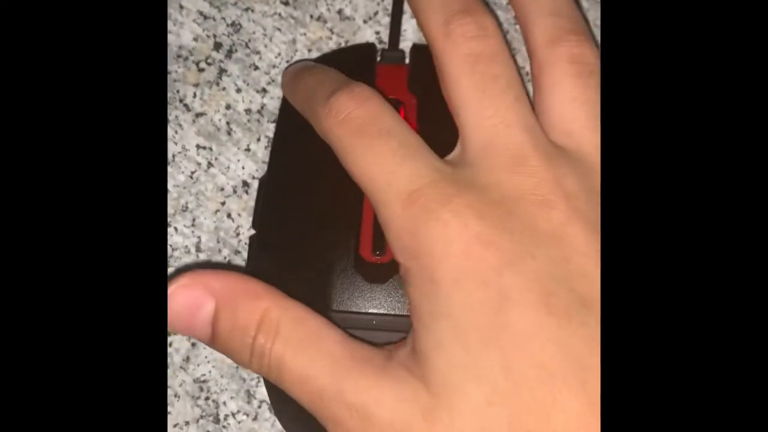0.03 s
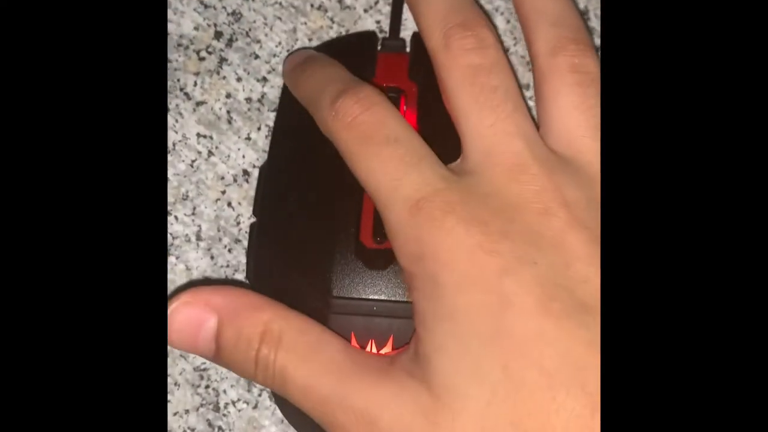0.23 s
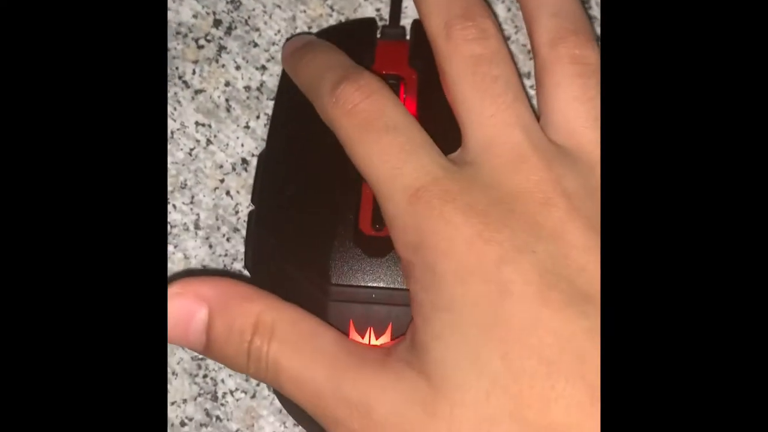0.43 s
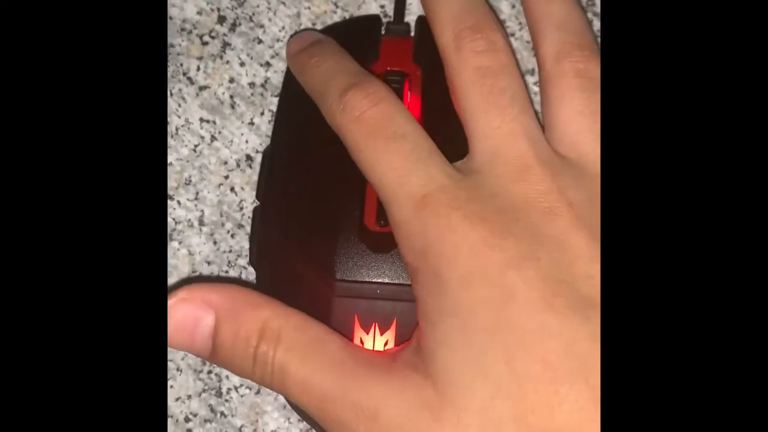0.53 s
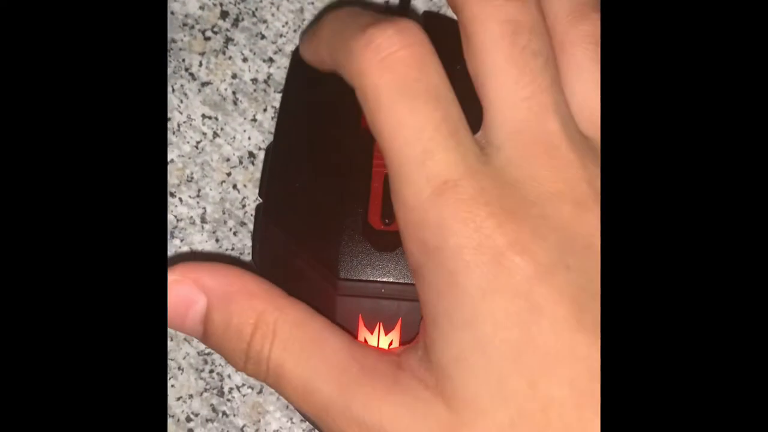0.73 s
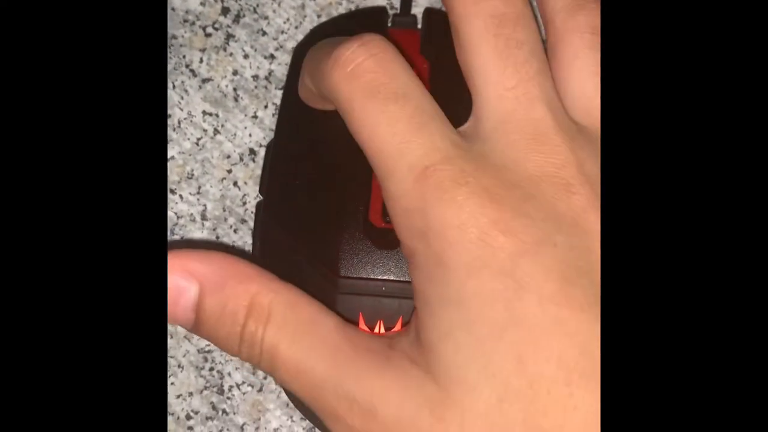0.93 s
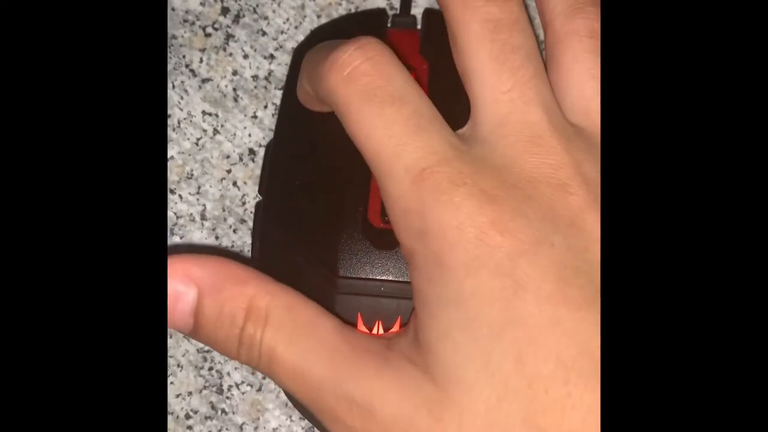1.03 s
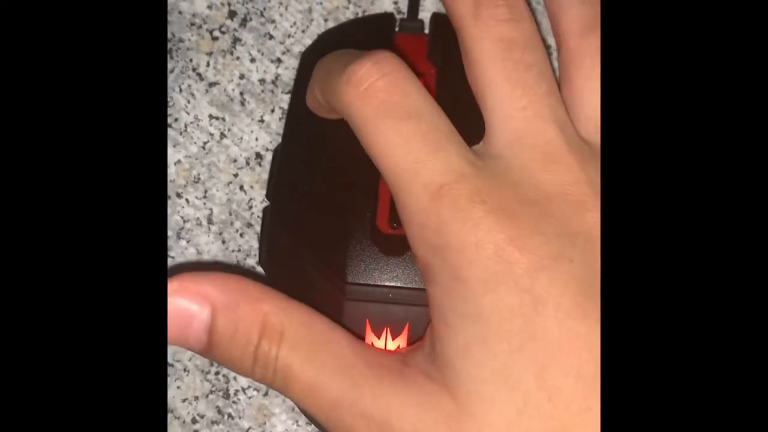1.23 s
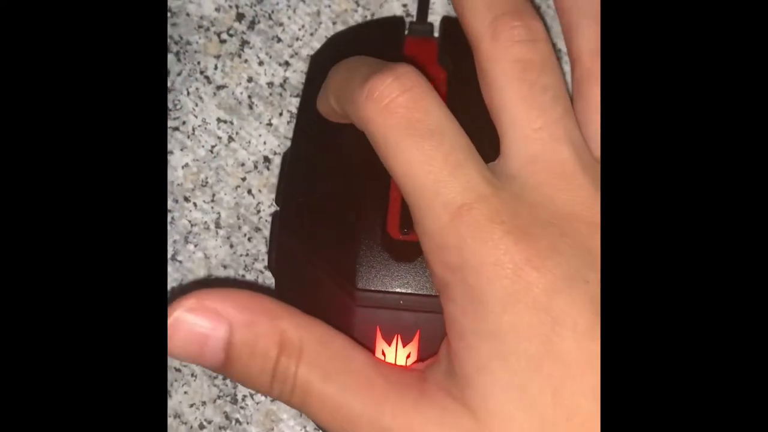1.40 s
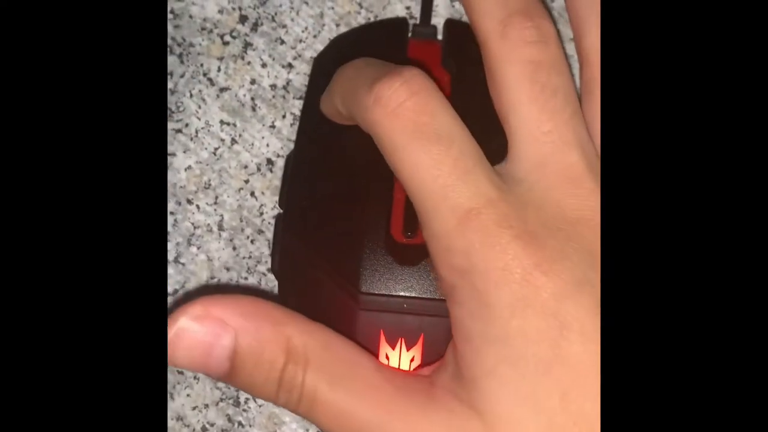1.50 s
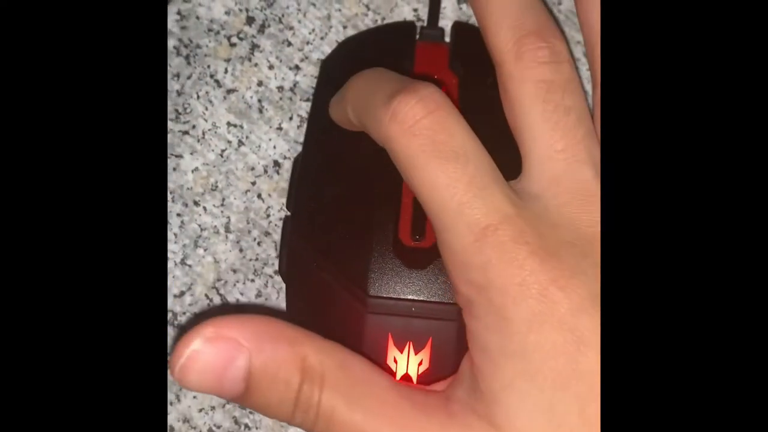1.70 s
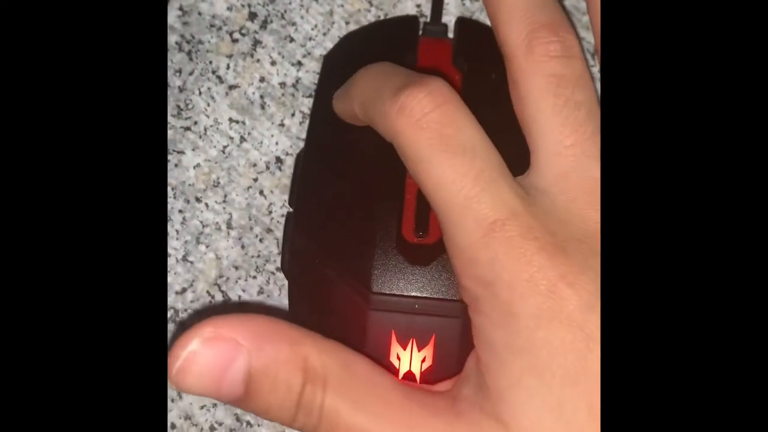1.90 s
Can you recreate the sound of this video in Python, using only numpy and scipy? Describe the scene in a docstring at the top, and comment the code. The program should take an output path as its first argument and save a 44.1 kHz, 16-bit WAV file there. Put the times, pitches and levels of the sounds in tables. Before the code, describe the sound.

A finger clicks a plastic computer mouse on a stone desk, close to the microphone: a release, one full click, faint taps and rubs, then four rapid clicks, over soft mains hum and low rumble.

```python
"""A finger clicks the button of a plastic computer mouse on a stone desk, close to the microphone.
Each press and release flips a spring switch: its contacts crackle as noise and ring damped shell modes.
A press then knocks the button on its stop, and a release knocks lightly, ringing the hollow body.
Between clicks the finger ticks, rubs and thuds on the shell, as filtered noise and damped modes.
A small room answers with decaying noise; wavering mains hum, low rumble and faint hiss lie beneath."""
import sys
import numpy as np
from scipy import signal
from scipy.fft import rfft, irfft
from scipy.io import wavfile
from scipy.ndimage import uniform_filter1d

SR = 44100
rng = np.random.default_rng(int(sys.argv[2]) if len(sys.argv) > 2 else 0)


def persist_wave(psi):
    """Save psi, clipped to +-1, as 16-bit WAV."""
    counts = np.round(np.clip(psi, -1, 1) * 32767).astype(np.int16)
    wavfile.write(sys.argv[1], SR, np.atleast_2d(counts).T)


N = 85995
T = np.arange(SR // 3) / SR  # time axis of one short sound (s)
SNAP_ATTACK_S = 0.00015  # rise of a switch contact or a nail tick

# Modes of the plastic shell. Each row: nominal frequency in Hz, t60 in seconds,
# level on a press in dB, level on a release in dB.
SHELL_MODES = [(3564, 0.012, -21.5, -23), (4486, .012, -21, -15), (6009, 0.0057, -5, -1),
               (6448, 0.015, -21, -2), (7108, 0.022, -3.5, -10.5), (7358, 0.014, -6.5, 3.5),
               (8025, 0.011, -1.5, -2.5), (8440, 0.0065, -6.5, -6), (9030, 0.0053, -15, -14.5),
               (10993, 0.005, -29, -13.5), (11590, 0.005, -22, -8.5), (12230, 0.0054, -11, -1.5),
               (13530, 0.0088, -7.5, .5), (13300, .008, -21, -5.5), (14650, 0.008, -15, -7),
               (16300, 0.01, -18.5, -19.5)]


def undb(db):
    """Level to amplitude: 20 dB is a factor of ten."""
    return 10 ** (np.asarray(db) / 20)


def noise(points, size):
    """Spectral shaping: white noise filtered to the given spectrum, at rms 1."""
    hz, db = np.array(points, float).T
    f = np.maximum(np.fft.rfftfreq(size, 1 / SR), 1)
    gain = undb(np.interp(np.log(f), np.log(hz), db))
    x = irfft(rfft(rng.standard_normal(size)) * gain, size)
    return x / x.std()


def envelope(attack, hold, t60):
    """Exponential damping after a straight rise and a hold: a fall of 60 dB in t60 seconds."""
    fall_time = np.maximum(T - attack - hold, 0)
    return np.minimum(T / attack, 1) * np.exp(-np.log(1000) * fall_time / t60)


def add(track, s, x):
    """Superposition: add a sound to the track, starting at s seconds."""
    i = int(s * SR)
    track[i:i + len(x)] += x[:len(track) - i]


def ring(hz):
    """Modal vibration: one undamped sine, slightly detuned, at a chance phase."""
    detuned_hz = hz * (1 + 0.0073 * rng.standard_normal())
    return np.sin(2 * np.pi * (detuned_hz * T + rng.random()))


def button():
    """Impact sequence: snaps, their spread in all directions, and the knocks that ring the body."""
    # Each row: start in seconds, snap level in dB, colour at 6, 8.4, 9.1 and 13 kHz in dB,
    # knock level in dB, travel to the stop in seconds, body pitch ratio, upper body modes in dB.
    presses = [(0.1536, -28, -5, -3, -2.5, -10.5, -38, 0.0029, 1.004, -3),
               (0.878, -34, -2.5, 0.5, -3.5, 1, -39, 0.0032, 1, 2),
               (1.0793, -31.5, -1, -2.5, 4, 0.5, -35.5, 0.0029, 1.01, 0.5),
               (1.2533, -30, 0.5, -7, 9.5, -5.5, -33, .0025, .99, 0),
               (1.412, -33.5, 1.5, 1.5, -18.5, 6, -40, 0.00274, 0.988, 0),
               (1.5595, -29.5, 2.5, -1.5, -0.5, 1.5, -32, .0025, 0.989, -1)]
    # Each row: start in seconds, snap level in dB, the same four colours in dB,
    # knock level in dB, body pitch ratio, upper body modes in dB.
    releases = [(0.0643, -30, -7, 4.5, 8.5, -4.5, -45, 1, -3),
                (0.258, -31.5, -16, 7.5, 3.5, -5, -48.5, 0.85, -5),
                (0.9787, -35, 2.5, -45, 12, 1.5, -54, .97, 6),
                (1.1614, -37, 5, 7, 18.4, 6, -49.5, .93, -0.5),
                (1.348, -36, -3, 5.5, 11, 2, -49.5, 0.97, 7.5),
                (1.5044, -38, 6.5, -11.5, 21, -2, -50, 1, -1.5),
                (1.6659, -37, 5, -7.5, 20, 0.5, -48, 0.92, 3)]
    # Spectrum of the snap as it spreads. Each row: frequency in Hz, relative density in dB per Hz.
    spread_spectrum = [(450, -14), (900, -5.5), (2400, -19.5), (3500, -9), (5100, -33.5), (6000, -3),
                       (7400, 0), (8600, -4), (9800, -33), (11200, -2.5), (13300, -7), (14800, -38.5)]
    spread_db = -2
    press_hold_s, release_hold_s = 0.00031, 0.00052
    rebound_s, rebound_db = 0.0072, -14.5
    # the whole mouse rocks on the desk under a press
    rock_hz, rock_t60_s, rock_db, rock_delay_s = 243.6, 0.053, -18.5, 0.007

    snaps, knocks = np.zeros((2, N))
    press_db, release_db = np.array(SHELL_MODES).T[2:]
    for s, db, *colour, knock_db, travel, pitch, upper_db in presses:
        add(snaps, s, undb(db) * snap(press_db, colour, press_hold_s))
        blow = knock(attack=0.002105, hold=0.002, t60_scale=0.98, pitch=pitch, upper_db=upper_db)
        stop = undb(knock_db) * blow
        add(knocks, s + travel, stop)
        add(knocks, s + travel + rebound_s, undb(rebound_db) * stop)
        add(knocks, s + rock_delay_s, undb(knock_db + rock_db) * thud(rock_hz, rock_t60_s))
    for s, db, *colour, knock_db, pitch, upper_db in releases:
        add(snaps, s, undb(db) * snap(release_db, colour, release_hold_s))
        blow = knock(attack=0.0012, hold=0.00069, t60_scale=0.95, pitch=pitch, upper_db=upper_db)
        add(knocks, s, undb(knock_db) * blow)
    loudness = np.sqrt(np.abs(uniform_filter1d(snaps ** 2, size=64)))  # short-time rms
    spread = undb(spread_db) * loudness * noise(spread_spectrum, N)
    return snaps, spread, knocks


def snap(levels, colour, hold):
    """Impulsive excitation: each contact of the switch spring cracks and kicks the shell's modes."""
    # Pitches in Hz at which the finger's place colours the snap; the second is the reference.
    colour_hz = [6000, 7300, 8400, 9100, 13000]
    # Spectrum of the crack. Each row: frequency in Hz, relative density in dB per Hz.
    crack_spectrum = [(350, -19.5), (750, 1.5), (1500, -8.5), (2600, -14), (3500, -4), (4000, -9.5),
                      (4450, 5.5), (4900, -4), (8800, 6.5), (10000, 6), (12000, 2), (15000, 3.5),
                      (16000, -26.5)]
    crack_db, crack_t60_s = -4.5, 0.025
    contact_t60_s = 0.004
    ring_share = 0.55  # gain of the ring-on beside the first contact

    hz, t60 = np.array(SHELL_MODES).T[:2]
    tint = np.interp(hz, colour_hz, [colour[0], 0, *colour[1:]])
    contacts = np.zeros(len(T))
    for s, gain in chatter():
        add(contacts, s, gain * envelope(SNAP_ATTACK_S, hold, contact_t60_s))

    def shape(decay):
        """Forced and free vibration: the larger of the contacts and the ring-on."""
        return np.maximum(contacts, ring_share * envelope(SNAP_ATTACK_S, 0.0026, decay))

    modes = sum(undb(db) * ring(f) * shape(decay) for f, decay, db in zip(hz, t60, levels + tint))
    crack = noise(crack_spectrum, len(T)) * shape(crack_t60_s)
    return modes + undb(crack_db) * crack


def chatter():
    """Contact bounce: the spring strikes twice, then tends to weaken; rows of (seconds, gain)."""
    gap_s, gap_scatter = 0.0011, 0.25  # typical gap, and its spread as a natural logarithm
    fall_db, scatter_db = -6, 1.5  # change per bounce, and its spread
    gaps, sizes = rng.standard_normal(size=(2, 5))
    times = np.cumsum(gap_s * np.exp(gap_scatter * gaps))
    gains = undb(fall_db * np.arange(len(times)) + scatter_db * sizes)
    return [(0, 1), *zip(times, gains)]


def knock(attack, hold, t60_scale, pitch, upper_db):
    """Modal excitation: a blow rings the hollow body; the finger's place and pressure shift its modes."""
    # Each row: frequency in Hz before the pitch ratio, level in dB before the upper-mode gain,
    # t60 in seconds before its scale.
    body_modes = [(244.2, -19.5, 0.29), (670, -17, 0.014), (940, -2.5, 0.018), (1057, -10.5, 0.038),
                  (1464, -19.5, 0.03), (1544, -15, 0.027), (1860, -19, 0.018), (2088, -19, 0.0061)]
    # Corner frequencies in Hz of the band of upper modes.
    upper_hz = [1100, 1400, 1650, 2100]
    out = np.zeros(len(T))
    for f, db, t60 in body_modes:
        gain = undb(db + np.interp(f, upper_hz, [0, upper_db, upper_db, 0]))
        mode = np.sin(2 * np.pi * f * pitch * (T - attack))
        out += gain * mode * envelope(attack, hold, t60 * t60_scale)
    return out


def thud(hz, t60):
    """Rigid-body resonance: the mouse rocks on the desk as one soft, low, damped mode."""
    return ring(hz) * envelope(0.013, 0.0025, t60)


def finger():
    """Impact and friction: the nail ticks, the body knocks and thuds, and the fingertip rubs."""
    # Each row: start in seconds, tick level in dB, rub level in dB, rub length (hold) in seconds,
    # knock level in dB, thud level in dB, upper body modes in dB.
    touches = [(0.455, -70, -64, .012, -62, -60, -13), (0.4779, -43, -44, 0.013, -46, -64, 17),
               (0.492, -60.5, -56, 0.0033, -41.5, -64, -7), (0.699, -59, -63, 0.0079, -70, -82, -4),
               (0.7056, -47.5, -59.5, 0.012, -53, -46, 10), (1.1975, -66, -61, 0.0033, -55, -63, 1),
               (1.8507, -57, -79, 0.00086, -63.5, -68.5, 12.5)]
    # Spectrum of a nail tick. Each row: frequency in Hz, relative density in dB per Hz.
    tick_spectrum = [(400, -5.5), (2000, 2), (2700, -18.5), (3700, 2), (8500, 1), (10000, -9.5),
                     (12000, -6), (14000, -19), (15100, -13), (16500, -54)]
    # Spectrum of a fingertip rubbing the hollow body. Each row: frequency in Hz,
    # relative density in dB per Hz.
    rub_spectrum = [(200, -23), (450, -21), (630, -3.5), (720, 0), (825, 8.5), (890, 1), (970, -1),
                    (1060, -3.5), (1200, -14), (1550, -2.5), (1700, -21), (1870, 0), (2250, -21.5),
                    (5000, -29), (16000, -66)]
    tick_t60_s, rub_t60_s = 0.025, 0.048
    thud_hz, thud_t60_s = 80.7, 0.054

    out = np.zeros(N)
    for s, tick_db, rub_db, length, knock_db, thud_db, upper_db in touches:
        add(out, s, undb(thud_db) * thud(thud_hz, thud_t60_s))
        tick = noise(tick_spectrum, len(T)) * envelope(SNAP_ATTACK_S, 0.0014, tick_t60_s)
        add(out, s, undb(tick_db) * tick)
        rub = noise(rub_spectrum, len(T)) * grip() * envelope(0.00053, length, rub_t60_s)
        add(out, s, undb(rub_db) * rub)
        blow = knock(attack=0.001134, hold=0.0016, t60_scale=0.93, pitch=1.04, upper_db=upper_db)
        add(out, s, undb(knock_db) * blow)
    return out


def grip():
    """Stick-slip friction: skin catches and slips in uneven bursts of rms 1."""
    grains_per_s, grain_s = 600, 0.0005  # mean rate, and time to a grain's peak
    catches = (rng.random(len(T)) < grains_per_s / SR) * rng.uniform(0.59, 1, len(T))
    grain = T / grain_s * np.exp(1 - T / grain_s)
    bursts = 0.4 + signal.fftconvolve(catches, grain)[:len(T)]
    return bursts / np.sqrt(np.mean(bursts ** 2))


def ports(x):
    """Interaural-style differences: two microphone ports hear a small lag and unequal shading."""
    # Left port against right port. Each row: frequency in Hz, phase lead in radians, level in dB.
    port_response = [(0, 1.5, -1.5), (560, 1.25, -1.5), (1000, 0.99, -1), (1760, 0.47, 0),
                     (2140, 1.76, -12), (3228, 1.1, -5.5), (4770, 2.99, 5), (6114, 4.96, 1.5),
                     (6970, 6.075, 1.05), (17270, 18.25, -1.5)]
    hz, lead, db = np.array(port_response).T
    f = np.fft.rfftfreq(N, 1 / SR)
    tilt = undb(np.interp(f, hz, db) / 2)
    lag = np.exp(-1j * np.interp(f, hz, lead))
    return irfft(rfft(x) * np.array([tilt, lag / tilt]), N)


def room(x, db, t60):
    """Reverberation, one channel: convolution with a diffuse tail and an early cluster of reflections."""
    # Colour of the reflections. Each row: frequency in Hz, relative density in dB per Hz.
    wall_spectrum = [(200, 3.5), (500, 1), (1000, -3.5), (2500, -1), (5000, -3), (7500, -1.5),
                     (10000, -13.5), (13000, -2), (14200, -1), (15300, -16.5), (17000, -30.5)]
    echo_s, echo_db = 0.01, -3  # early cluster: delay, and level against the tail
    tail = noise(wall_spectrum, len(T)) * envelope(0.00067, 0.002, t60)
    early = noise(wall_spectrum, len(T)) * envelope(0.00017, 0.0012, 0.025)
    response = undb(db) * tail / np.linalg.norm(tail)
    add(response, echo_s, undb(db + echo_db) * early / np.linalg.norm(early))
    return signal.fftconvolve(x, response)[:N]


def background():
    """Tones and stationary noise: wavering mains hum, swelling low rumble and faint hiss."""
    # Each row: frequency in Hz, median level in dB rms, waver in dB, left minus right in dB.
    hum_lines = [(119.46, -53, 1.6, 2.5), (241.3, -70.5, 2.5, 6), (352.8, -76.5, 4.5, 3)]
    # Spectrum of the rumble. Each row: frequency in Hz, relative density in dB per Hz.
    rumble_spectrum = [(14, -51), (36, -1.5), (55, 0), (100, -2.5), (200, -12.5), (270, -17.5), (400, -37),
                       (600, -56.5), (3000, -88)]
    # Gain of the rumble. Each row: time in seconds, gain in dB.
    rumble_level = [(0, -58), (.23, -63), (.68, -64), (.74, -60.5), (.85, -59), (.95, -61), (1.95, -62.5)]
    # Spectrum of the hiss. Each row: frequency in Hz, relative density in dB per Hz.
    hiss_spectrum = [(300, 12), (700, -11.5), (1500, -6.5), (2600, -15.5), (5000, -17), (8500, -10.5),
                     (9800, -27.5), (11500, -11.5), (13500, -15), (15000, -28)]
    hiss_db = -71
    rumble_side = 0.13  # gain of the part with opposite sign left and right

    t = np.arange(N) / SR
    hum = np.zeros((2, N))
    for hz, db, depth, pan in hum_lines:
        waver = np.interp(t, np.linspace(0, t[-1], num=24), rng.standard_normal(size=24))
        level = db + depth * waver + np.array([[pan], [-pan]]) / 2
        hum += np.sqrt(2) * undb(level) * np.sin(2 * np.pi * (hz * t + rng.random()))
    side = rumble_side * noise(rumble_spectrum, N) * np.array([[1], [-1]])
    rumble = noise(rumble_spectrum, N) + side
    swell = undb(np.interp(t, *np.array(rumble_level).T))
    hiss = np.array([noise(hiss_spectrum, N), noise(hiss_spectrum, N)])
    return hum + swell * rumble + undb(hiss_db) * hiss


def scene():
    """Direct and reverberant sound over background; in the room, knocks die away sooner than snaps."""
    snap_send = 0.84  # gain of the direct snaps into the room
    snaps, spread, knocks = button()
    body = knocks + finger()
    walls = np.zeros((2, N))
    for channel in walls:
        channel += room(snap_send * snaps + spread, db=-21, t60=0.26)
        channel += room(body, db=-16, t60=0.18)
    return ports(snaps + body) + walls + background()


def record(dry):
    """Band limiting: the recorder's steep elliptic low-pass cuts the top above 16.5 kHz."""
    low_pass = signal.ellip(8, 0.2, 80, 16500, fs=SR, output="sos")
    return signal.sosfilt(low_pass, dry)


dry = scene()
out = record(dry)
persist_wave(out)
```